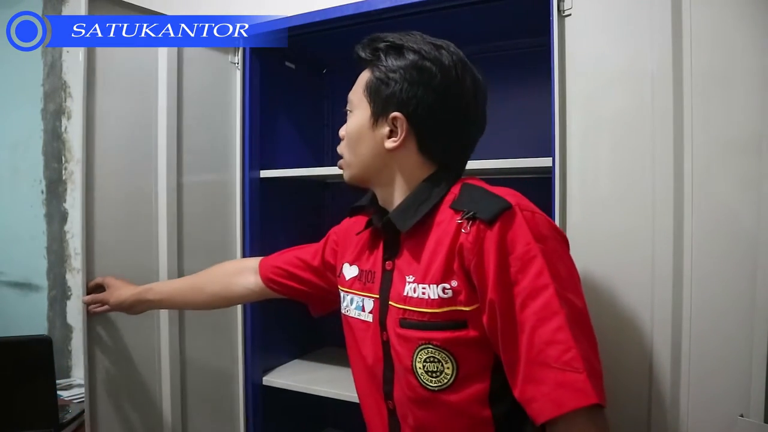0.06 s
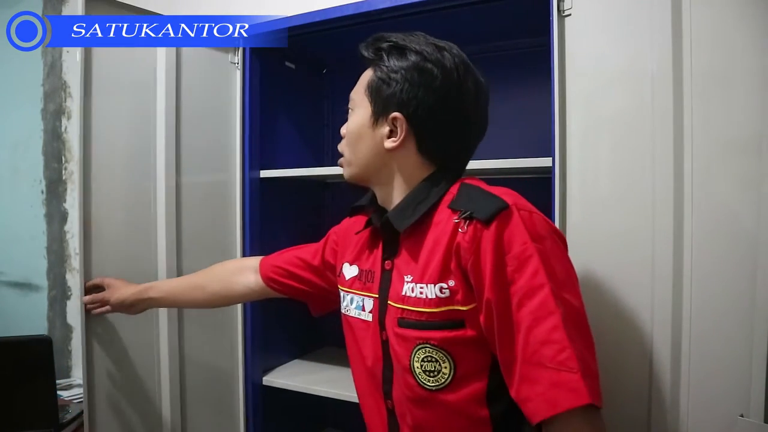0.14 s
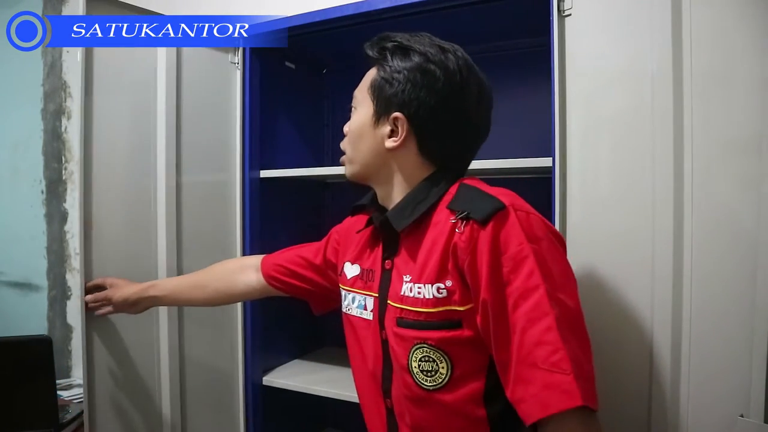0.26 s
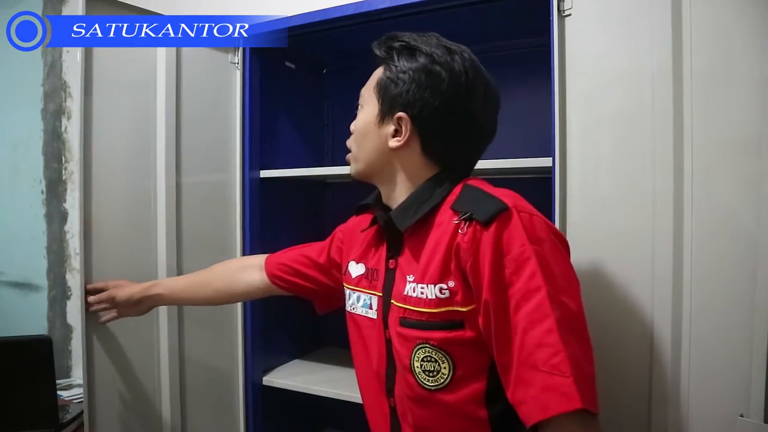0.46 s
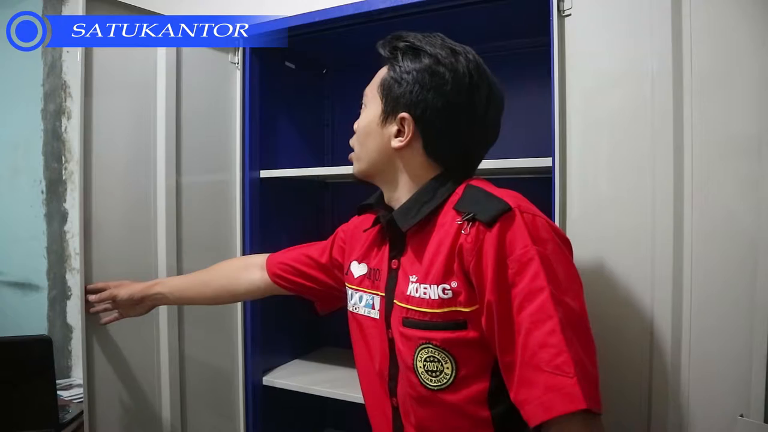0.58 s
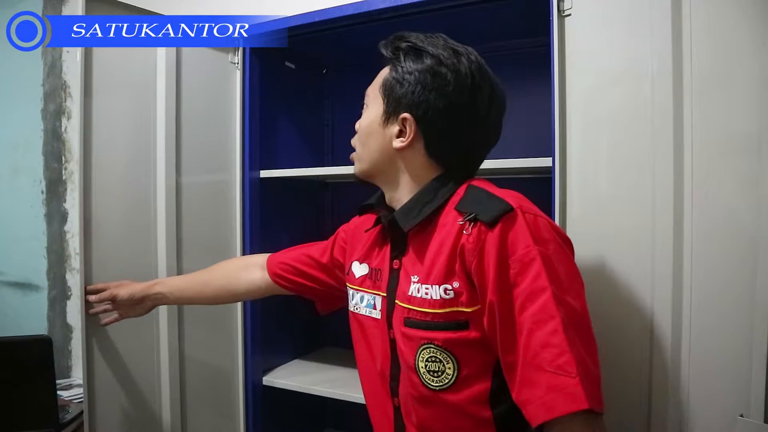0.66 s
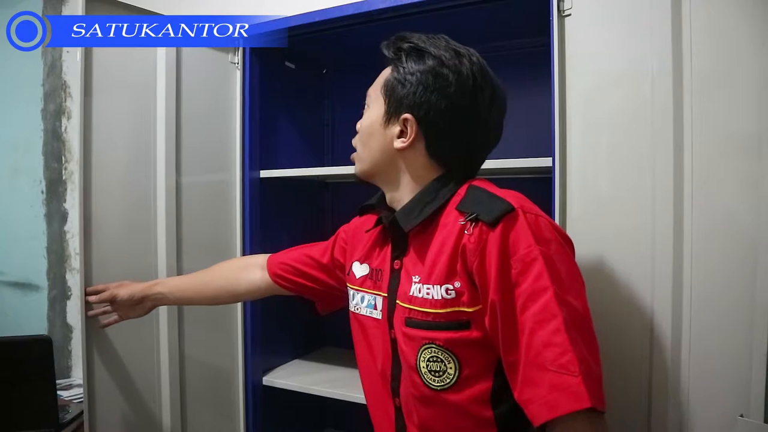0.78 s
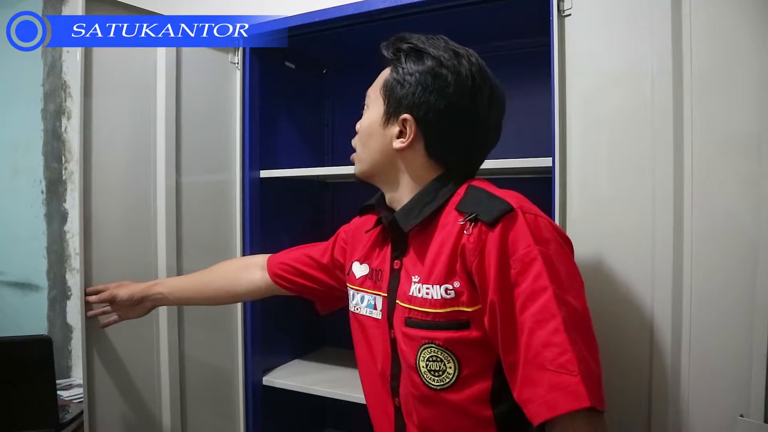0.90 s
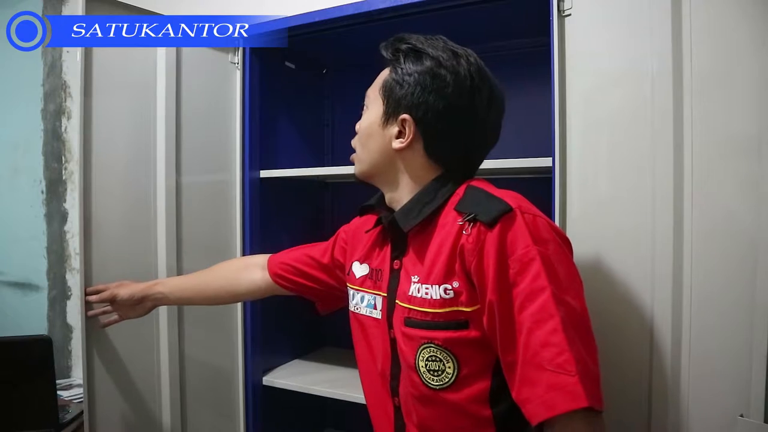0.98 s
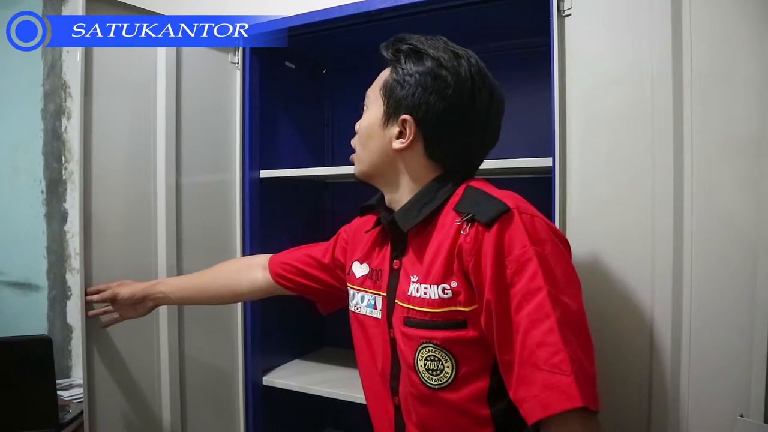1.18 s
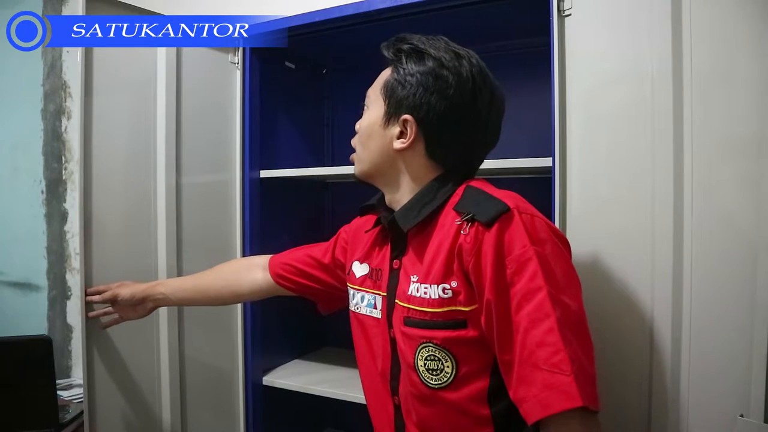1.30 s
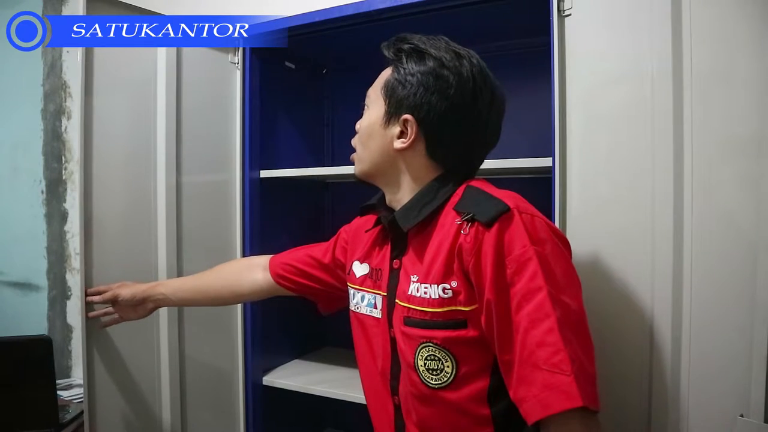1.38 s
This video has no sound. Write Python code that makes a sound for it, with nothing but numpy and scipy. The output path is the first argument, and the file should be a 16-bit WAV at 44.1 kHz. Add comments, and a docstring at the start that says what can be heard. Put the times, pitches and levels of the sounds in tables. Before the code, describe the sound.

A metal cabinet door bangs and rattles, ringing out in an echoing room.

```python
"""A faint, bright wash fades in the background noise of a bare, echoing room.
A sheet-steel cabinet door, flung to its stop, bangs, rebounds and chatters for a third of a second:
the panels ring and thump as they flex, the latch clicks, and a limiter holds the bang down.
Then the door knocks and ticks lightly as it settles, while the room carries the clang on."""
import sys
import numpy as np
from scipy import signal
from scipy.fft import rfft, irfft
from scipy.io import wavfile
from scipy.ndimage import uniform_filter1d

SR = 44100
rng = np.random.default_rng(int(sys.argv[2]) if len(sys.argv) > 2 else 0)


def dump_mix(stems):
    """Bounce the given channels to the path in sys.argv[1] as a 16-bit WAV at rate SR."""
    frames = np.atleast_2d(stems).T  # one column per channel
    limited = np.clip(frames, -1, 1)  # hard clip at full scale
    pcm = np.round(limited * 32767).astype(np.int16)
    wavfile.write(sys.argv[1], SR, pcm)


N = 63945
TIME_S, BIN_HZ = np.arange(N) / SR, np.fft.rfftfreq(N, 1 / SR)


def amp(db):
    """Decibels to gain."""
    return 10 ** (np.asarray(db) / 20)


def unit_rms(x):
    """Scales to an rms of one."""
    return x / np.sqrt(np.mean(x ** 2) + 1e-20)


def lookup(table, hz):
    """Interpolates on a log-frequency axis."""
    freq_hz, value = np.transpose(table)
    return np.interp(np.log(hz + 1), np.log(freq_hz + 1), value)


def rise(rise_s):
    """Soft onset envelope."""
    return 1 - np.exp(-TIME_S / rise_s)


def coloured(x, spectrum, extra_db=0):
    """Shapes white sound at equal power, then applies extra_db."""
    gain = unit_rms(amp(lookup(spectrum, BIN_HZ))) * amp(extra_db)
    return irfft(rfft(x) * gain, N)


def decaying(x, t60_table, colour=None):
    """Decays each frequency at its own rate."""
    hz, t, frames = signal.stft(x, SR, nperseg=512)
    gain_db = -60 * t / np.maximum(lookup(t60_table, hz), .01)[:, None]
    if colour:
        gain_db = gain_db + lookup(colour, hz)[:, None]
    return signal.istft(frames * amp(gain_db), SR, nperseg=512)[1][:, :N]


# Left-right likeness: freq_hz, correlation
COHERENCE = [(60, 1), (170, 0.91), (350, 0.57), (700, 0.26), (1400, 0.37), (2800, -0.071), (5500, -0.24),
             (12000, -0.1)]


def diffuse_noise():
    """White noise arriving from all sides at two microphones."""
    a, b = rfft(rng.standard_normal((2, N)))
    correlation = np.clip(lookup(COHERENCE, BIN_HZ), -.99, .99)
    mid = a * np.sqrt((1 + correlation) / 2)
    side = b * np.sqrt((1 - correlation) / 2)
    return irfft(np.array([mid + side, mid - side]), N)


# Room noise spectrum: freq_hz, relative_db
ROOM_NOISE_SPECTRUM = [(25, -21), (70, -16), (130, -3), (220, 1), (400, -2), (750, -1.5), (1500, -4.5),
                       (2500, -13.5), (4500, -26), (8000, -36.5), (11000, -46), (15000, -63)]


def room_noise(level_db=-48.5):
    """Steady, diffuse hush of the room."""
    return amp(level_db) * coloured(diffuse_noise(), ROOM_NOISE_SPECTRUM)


def tone_colour(hz, tilt_db_per_oct, bass_db, top_hz, clang_db):
    """Gain in dB of one event: brightness, clang, bass and treble roll-off."""
    clang_hz, clang_width_oct = 1070, 0.56
    tilt = tilt_db_per_oct * np.log2(np.clip(hz, 200, 5000) / 900)
    clang = clang_db * np.exp(-.5 * (np.log2((hz + 1) / clang_hz) / clang_width_oct) ** 2)
    bass = bass_db / (1 + (hz / 160) ** 4)
    rolloff = 10 * np.log10(1 + (hz / top_hz) ** 4)
    return tilt + clang + bass - rolloff


def steel_ripple(depth_db=2.5, spacing_hz=20):
    """Narrow peaks and dips in dB from the steel's countless small modes."""
    heights = np.clip(rng.standard_normal(4000), -2, 2)
    ripple_db = depth_db * np.interp(BIN_HZ / spacing_hz, np.arange(len(heights)), heights)
    return (ripple_db - depth_db ** 2 / 13) * np.clip(BIN_HZ / 1500, 0, 1)


# Steel panel spectrum: freq_hz, relative_db
PANEL_SPECTRUM = [(30, -48), (65, -31), (88, -28), (130, -15.5), (165, -24.5), (230, -6.5), (380, -3.5),
                  (520, -2), (700, -0.5), (1000, -4.5), (1500, -9), (2100, -12.5), (2450, -15),
                  (3400, -16.5), (5000, -23.5), (7500, -29.5), (10000, -36.5), (13000, -45.5), (15500, -52)]
# Panel decay before ring_scale: freq_hz, t60_s
PANEL_DECAY = [(100, 0.51), (500, 0.59), (2000, 0.51), (5000, 0.65), (12000, 0.51)]


def panel_ring(colour_db, ring_scale, gain_db=1):
    """Dense ring of the steel panels."""
    t60_table = [(hz, ring_scale * t60_s) for hz, t60_s in PANEL_DECAY]
    return amp(gain_db) * decaying(coloured(diffuse_noise(), PANEL_SPECTRUM, colour_db), t60_table)


def chatter(colour_db, ring_scale, ticks_per_s=200, tick_s=0.0021, spread_db=1.5, gain_db=-7.5):
    """Loose steel buzzes in uneven ticks that die away."""
    hits = rng.random(N) < ticks_per_s / SR
    ticks = hits * amp(spread_db * np.minimum(rng.exponential(1, N), 3))
    bursts = unit_rms(signal.lfilter([1], [1, -np.exp(-1 / (tick_s * SR))], ticks))
    buzz = coloured(bursts * diffuse_noise(), PANEL_SPECTRUM, colour_db)
    decay_s = 0.063 * ring_scale
    return amp(gain_db) * np.exp(-TIME_S / decay_s) * buzz


def treble_lag(x, split_hz=2500, lag_s=0.0022):
    """In thin steel the treble builds up just after the bass."""
    bass = signal.sosfilt(signal.butter(1, split_hz, fs=SR, output="sos"), x)
    return bass + (x - bass) * rise(lag_s) ** 2


# Door and cabinet modes: pitch_hz, relative_db, t60_s
DOOR_MODES = [(88, -15, 0.64), (116.5, -29, 2.3), (129.24, -13, 2.2), (186.4, -19, 4.7), (222, -10, 1.84),
              (236.5, -10.5, 2.9), (324.8, -7, 1.17), (440.4, -3, 1.08), (472, -13.5, 2.1),
              (485.6, 5, 0.58), (578.4, -1, 1.24), (660, 0.5, 0.94), (647, -4.5, 1.2), (695, -6.5, 1.8),
              (763, -16, 2.1), (867, -9, 1.1), (944, -0.5, 0.75), (1070, -5, 0.64), (1371, -15, 1.54),
              (1713, -6, 0.44), (2089, -4, 0.27), (2328, -19, 1.5), (3500, -23, 1.1)]


def door_modes(tone, gain_db=-13, rise_s=0.0063):
    """The strongest modes; the higher ones reach the two microphones out of phase."""
    modes = np.zeros((2, N))
    for hz, relative_db, t60_s in DOOR_MODES:
        half_gap_rad = np.arccos(lookup(COHERENCE, hz)) / 2
        phase_rad = half_gap_rad * rng.choice([-1, 1]) * np.array([[1], [-1]])
        envelope = amp(relative_db + tone_colour(hz, *tone) - 60 * TIME_S / t60_s)
        modes += envelope * np.sin(2 * np.pi * hz * TIME_S + phase_rad)
    return amp(gain_db) * rise(rise_s) * modes


# Echo decay: freq_hz, t60_s
ECHO_DECAY = [(100, 3.5), (250, 2.0), (600, 1.5754), (1500, 1.4754), (4000, 1.0154), (8000, 1.0),
              (14000, 0.22)]
# Echo colour: freq_hz, gain_db
ECHO_COLOUR = [(100, -7), (250, -8.5), (600, -6), (1500, -6.5), (4000, -7), (10000, -6)]


def room_echo(colour_db, rise_s=0.014):
    """The bare room carries the clang on as a diffuse tail."""
    steel_noise = coloured(diffuse_noise(), PANEL_SPECTRUM, colour_db)
    return rise(rise_s) * decaying(steel_noise, ECHO_DECAY, ECHO_COLOUR)


def add(mix, start_s, sound):
    """Mixes a sound in at start_s."""
    tail = mix[:, round(start_s * SR):]
    tail += sound[:, :tail.shape[1]]


# First row: faint, bright wash in the background noise. Other rows: the door strikes its frame.
# start_s, gain_db, tilt_db_per_oct, bass_db, top_hz, clang_db, ring_scale, rise_s
WASH_AND_BLOWS = [(.012, -56, 3, -8, 9800, -8, 1.2, .014), (.238, -20.5, -2, -4, 15000, 0, 0.8, 0.0014),
                  (.245, -16, 1, -9, 19000, 3, 0.8, 0.0066),
                  (.259, -22, -0.5, -10.5, 13000, -4.5, 0.74, .002),
                  (.280, -18.5, 1.5, 3.5, 9500, -1, 0.67, .0025),
                  (.304, -26, 0, -4, 8500, 5.5, 0.5, 0.0022),
                  (.348, -20, -.5, -1.5, 11800, -1.5, 1, 0.0015),
                  (.359, -16.5, 0.43, 5.5, 15000, -1.5, 0.91, 0.0054),
                  (.386, -23, 1.5, 3, 11000, -2, 1, .003), (.408, -24.5, -1, -7, 10000, -0.5, 0.94, 0.0021),
                  (.427, -24, 1.45, 0.5, 10000, 4, 0.88, 0.0034),
                  (.472, -22.5, 0.56, 1.5, 12000, 1.5, .85, .0025),
                  (.497, -26.5, 0.4, -20, 11000, -3.5, 0.84, 0.0041),
                  (.512, -29, 0.7, -4, 9000, -1.5, .7, 0.0014), (.59, -34, 1.5, 3, 7000, -5, 0.76, .004),
                  (.741, -39, 2.5, 4, 6000, 1.5, 0.92, .002), (.756, -34, 2, -5, 4500, 0.5, .7, 0.0016),
                  (.868, -52, 4, -2.5, 15100, 5.5, 1.086, .004), (.922, -43, 0, 6, 15000, 5, 0.76, 0.0062),
                  (.968, -47, 0.5, 1, 12000, -5, 1, .003), (1.024, -44.5, -2.5, -3, 7004, -5, 1.1, .01),
                  (1.125, -55.5, 3.5, -3, 12200, 2, 1.23, 0.02)]


def wash_and_blows(mix):
    """A faint wash, then the door's blows; each is built from ring, chatter, modes and echo."""
    ripple_db = steel_ripple()
    for start_s, gain_db, *tone, ring_scale, rise_s in WASH_AND_BLOWS:
        colour_db = tone_colour(BIN_HZ, *tone)
        ring = panel_ring(colour_db + ripple_db, ring_scale)
        clang = rise(rise_s) * treble_lag(ring + chatter(colour_db, ring_scale))
        echo = room_echo(colour_db + ripple_db)
        add(mix, start_s, amp(gain_db) * (clang + door_modes(tone) + echo))


# Panel flexes, and low thuds of the cabinet body (about 106-306 Hz): start_s, peak_db, pitch_hz, time_to_peak_s
PANEL_AND_BODY_THUMPS = [(.237, -18.5, 478, 0.0067), (.258, -8.5, 514, 0.0052), (.284, -12.5, 513, 0.0068),
                         (.286, -33.5, 124, 0.02), (.347, -13.5, 510, .009), (.356, -7, 553, 0.0051),
                         (.362, -36.5, 106, 0.022), (.406, -14.5, 547, 0.0057), (.426, -29, 306, 0.0091),
                         (.481, -23.5, 568, 0.012), (.765, -37, 550, .006), (0.767, -40, 126, .022),
                         (1.016, -41.5, 572.7, 0.025)]


def panel_and_body_thumps(mix, sharpness=3.45):
    """A panel flexes, or the cabinet body thuds, for a few heavy cycles that swell and die."""
    for start_s, peak_db, pitch_hz, time_to_peak_s in PANEL_AND_BODY_THUMPS:
        progress = TIME_S / time_to_peak_s
        swell = (progress * np.exp(1 - progress)) ** sharpness
        thump = amp(peak_db) * swell * np.sin(2 * np.pi * pitch_hz * TIME_S)
        add(mix, start_s, thump[None])


# Latch snaps: start_s, gain_db, tilt_db_per_oct
LATCH_CLICKS = [(0.266, -24, 5), (0.2859, -22, 2.5), (.3635, -19.5, 2), (0.3902, -19, 2), (.742, -41, 3),
                (.751, -37, 1), (0.756, -34.5, 4.5), (.769, -38, 5), (.792, -34, 1)]


def latch_clicks(mix, rise_s=0.00099, decay_s=.009):
    """Steel snaps on steel in the latch: short, bright cracks."""
    envelope = rise(rise_s) * np.exp(-TIME_S / decay_s)
    for start_s, gain_db, tilt_db_per_oct in LATCH_CLICKS:
        colour_db = tone_colour(BIN_HZ, tilt_db_per_oct, bass_db=-22, top_hz=5200, clang_db=-5)
        click = coloured(envelope * diffuse_noise(), PANEL_SPECTRUM, colour_db)
        add(mix, start_s, amp(gain_db) * click)


def scene():
    """Room noise and a fading wash, then the door's blows, thumps and clicks."""
    mix = room_noise()
    wash_and_blows(mix)
    panel_and_body_thumps(mix)
    latch_clicks(mix)
    balance_db = 0.16
    return mix * amp([[balance_db], [-balance_db]])


def record(dry):
    """A limiter takes off part of the level above its threshold; a low-pass follows."""
    threshold_db, reduction_share, release_db_per_s, cutoff_hz = -16.5, 0.41, 70, 15500
    power_db = 10 * np.log10(abs(uniform_filter1d((dry ** 2).mean(0), size=500)) + 1e-12)
    release_db = TIME_S * release_db_per_s
    held_db = np.maximum.accumulate(power_db + release_db) - release_db
    over_db = np.maximum(held_db - threshold_db, 0)
    limited = dry / amp(reduction_share * uniform_filter1d(over_db, size=200))
    lowpass = signal.firwin(511, cutoff_hz, window=("kaiser", 9), fs=SR)
    return signal.oaconvolve(limited, lowpass[None], "same")


dry = scene()
out = record(dry)
dump_mix(out)
```